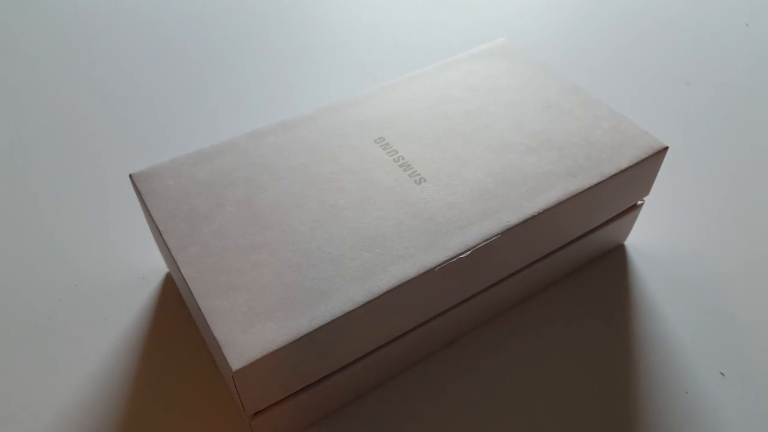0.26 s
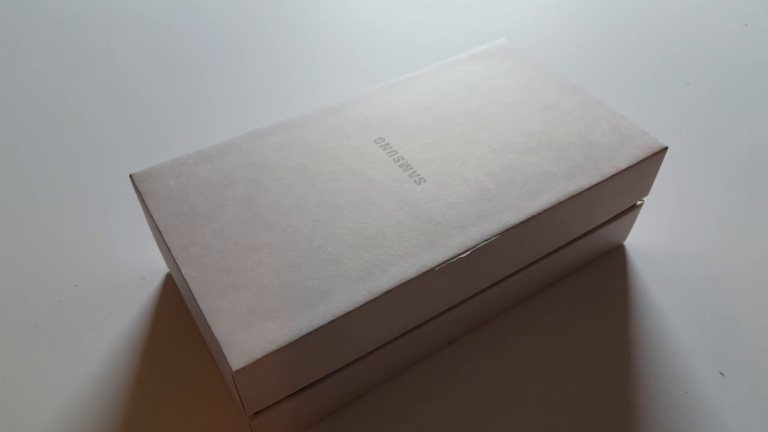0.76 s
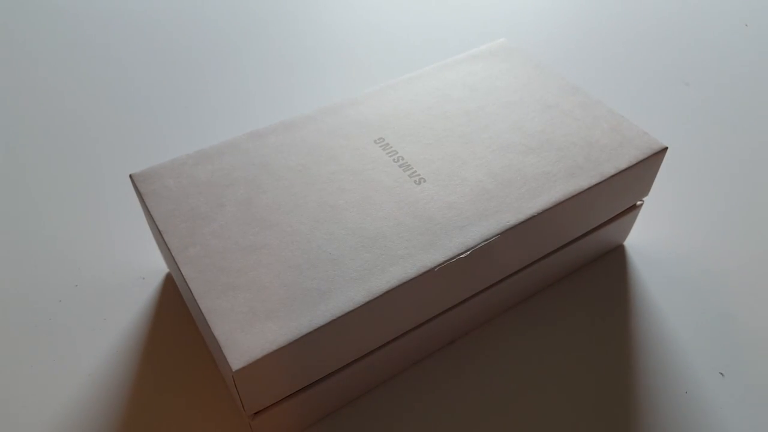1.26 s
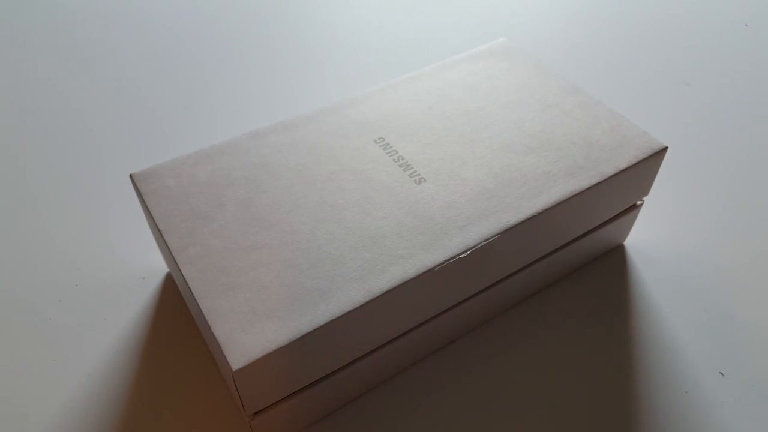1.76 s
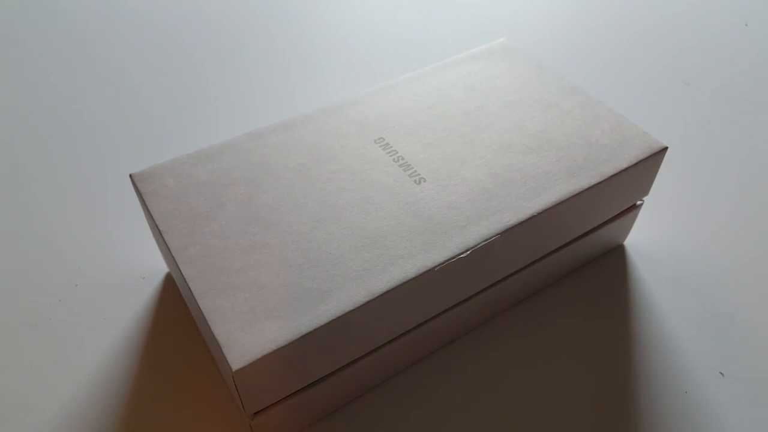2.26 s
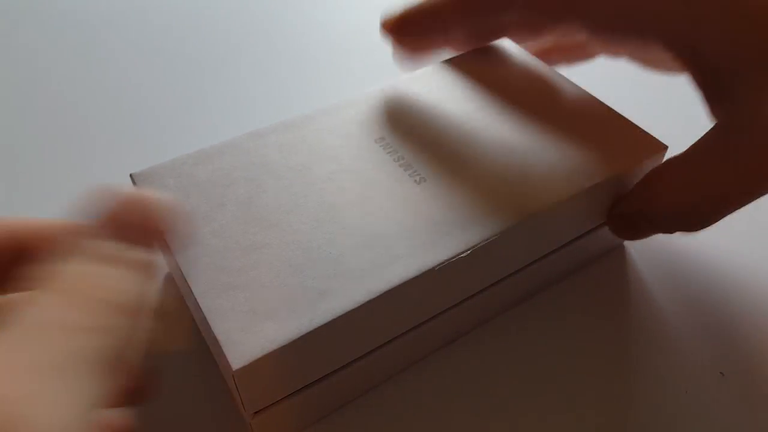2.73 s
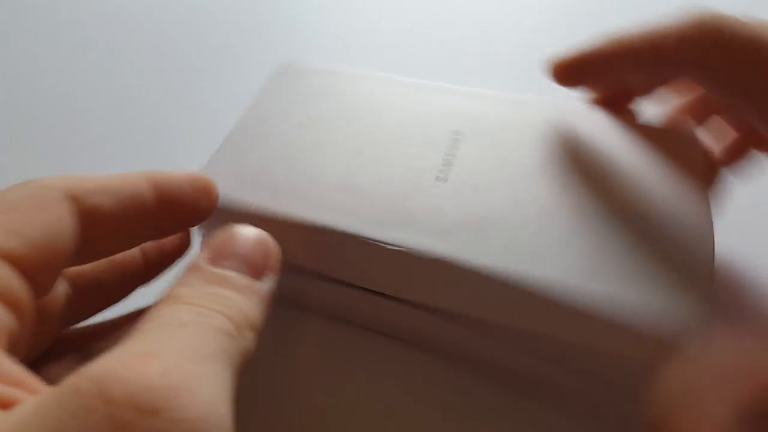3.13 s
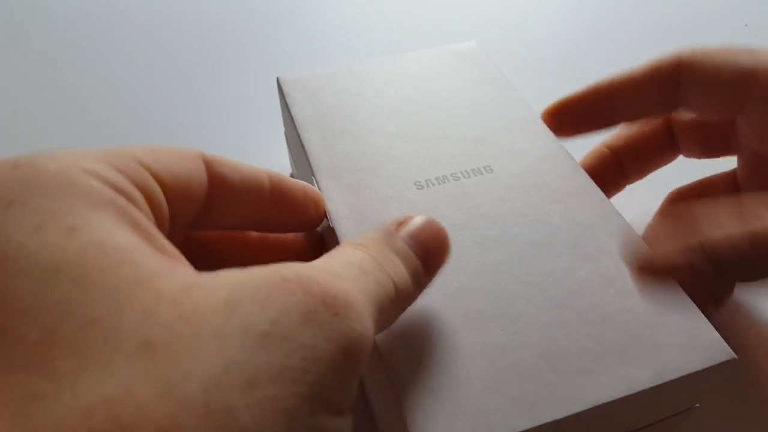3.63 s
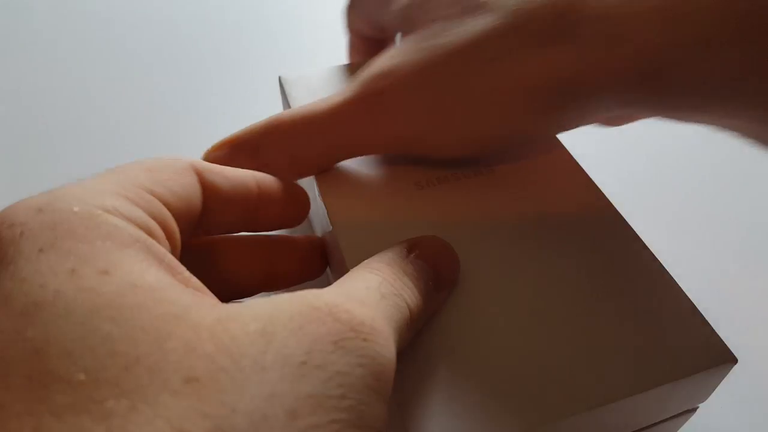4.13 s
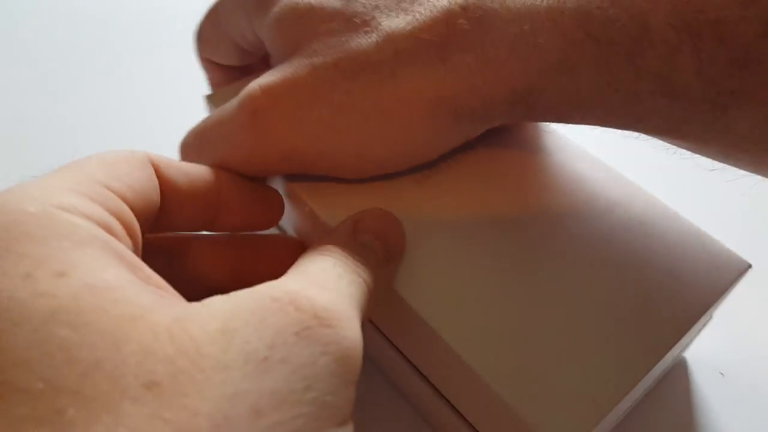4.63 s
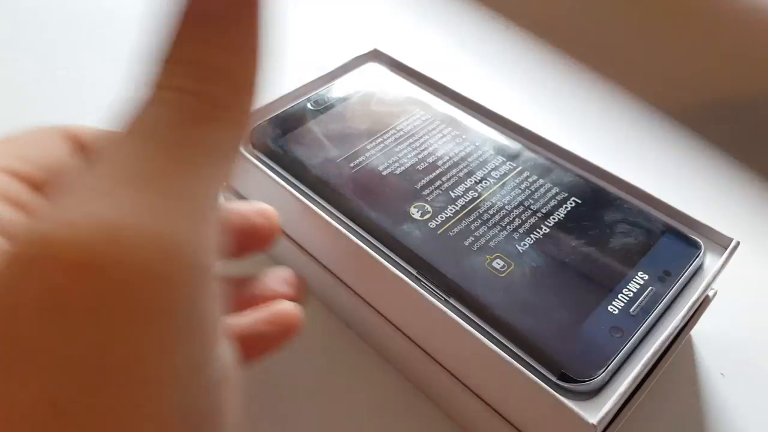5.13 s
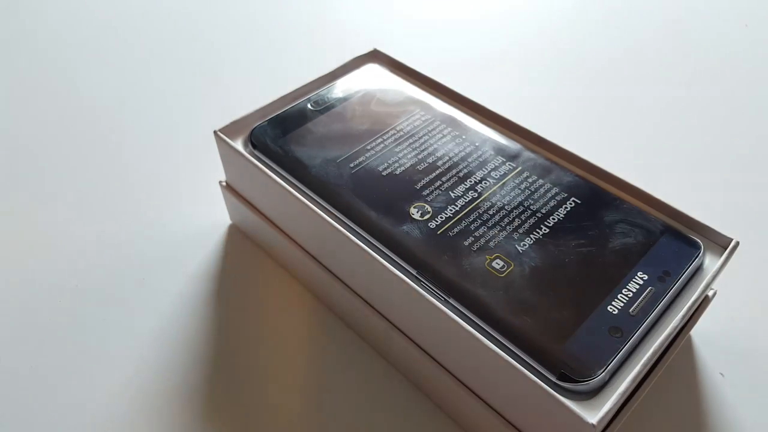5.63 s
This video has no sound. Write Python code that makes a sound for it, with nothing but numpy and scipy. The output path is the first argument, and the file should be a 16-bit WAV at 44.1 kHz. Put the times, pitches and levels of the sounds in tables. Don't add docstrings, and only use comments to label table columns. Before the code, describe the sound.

A small quiet room with soft low air noise and a barely audible hum. At about 0.1 s a hard double knock rings a hollow wooden table, with a short roomy tail. Faint skin and sleeve brushing follows; lighter knocks come in clusters near 1.25, 1.65 and 1.9 s, with a low rub on the table around 1.7 s. From 2.4 s a cardboard box close to the microphone is dragged and turned: dry, uneven stick-slip scraping, brightest from 3.1 to 3.4 s, ending in a dull tap. It settles with soft rustle until about 3.9 s. Drier finger taps with a deep soft thump come at 4.0 s, then small grip taps. Between 4.5 and 5.05 s the snug lid slides off with a hollow, papery, slightly squeaky rub and little bumps. Near quiet follows, then a light brush and clicks at 5.65 s, and soft bumps at 5.8 s.

```python
import sys
import numpy as np
from scipy import signal
from scipy.fft import rfft, irfft, next_fast_len
from scipy.io import wavfile
from scipy.ndimage import uniform_filter1d

SR = 44100
rng = np.random.default_rng(int(sys.argv[2]) if len(sys.argv) > 2 else 0)


def gain_from_decibels(decibels):
    exponent = np.asarray(decibels, float) / 20
    return 10 ** exponent


def wrap_up_sound(samples):
    columns = np.atleast_2d(samples).T
    tamed = np.clip(columns, -1, 1)
    steps = np.round(tamed * 32767).astype(np.int16)
    wavfile.write(sys.argv[1], SR, steps)


N = 259749

# frequency in Hz, side minus mid in dB.
SIDE_SPREAD = [(60, -16), (110, -12), (200, -19), (380, -9), (700, -7), (1290, 0.5), (2380, 0.5),
               (4400, 0.5), (8120, 0), (15000, 0.5)]


def level(x, db):
    return x * gain_from_decibels(db) / np.sqrt(np.mean(x ** 2))


def curve(hz, table):
    points, values = np.transpose(table)
    return np.interp(np.log(np.maximum(hz, 1)), np.log(points), values)


def colour(x, gain):
    size = next_fast_len(x.shape[-1])
    hz = np.arange(size // 2 + 1) * SR / size
    return irfft(rfft(x, size) * gain(hz), size)[..., :x.shape[-1]]


def split(x, edges_hz, order=3):
    bands = []
    for hz in edges_hz:
        lowpass = signal.butter(order, hz, fs=SR, output="sos")
        highpass = signal.butter(order, hz, "high", fs=SR, output="sos")
        bands.append(signal.sosfilt(lowpass, x))
        x = signal.sosfilt(highpass, x)
    return bands + [x]


def walk(rate):
    hold = int(SR / rate)
    steps = np.repeat(rng.standard_normal(N // hold + 1), hold)
    smooth = uniform_filter1d(uniform_filter1d(steps, hold), hold)
    return 0.478 * smooth[:N]


def ports(mid, side, table, pan_db=0):
    side = colour(side, lambda hz: gain_from_decibels(curve(hz, table)))
    return np.array([(mid + side) * gain_from_decibels(pan_db / 2), (mid - side) * gain_from_decibels(-pan_db / 2)])


def hush():
    # frequency in Hz, density in dB per Hz.
    air = [(12, -29), (20, -4), (60, -11), (91, 0.5), (138, -3.5), (210, -8), (399, -3.5), (446, -6.5),
           (780, -19), (2020, -24.5), (2260, -21), (2460, -25), (9400, -38.5), (13500, -31), (16000, -34)]
    # frequency in Hz, side minus mid in dB.
    air_spread = [(60, -8), (110, -10), (200, -3.5), (380, -9), (700, 1.5), (1290, 4.5), (2380, -1),
                  (4400, 1.5), (8120, 1), (15000, 1.5)]
    # frequency in Hz, level in dB.
    hum = [
        (120.5, -70),
        (13318, -90),
        (14330, -104),
    ]
    noise = colour(rng.standard_normal((2, N)), lambda hz: gain_from_decibels(curve(hz, air)))
    bands = split(noise, [150, 400, 1200])
    wander_db = (0.73, 15.0, 1.9, 0.68)
    mid, side = level(sum(band * gain_from_decibels(db * walk(3.1)) for band, db in zip(bands, wander_db)), -66.5)
    s = np.arange(N) / SR
    tones = 0
    for hz, db in hum:
        tones = tones + np.sqrt(2) * gain_from_decibels(db + 3.0 * walk(7.7)) * np.sin(2 * np.pi * hz * s)
    return ports(mid, side, air_spread) + tones


def fibres(rate, spread_db):
    size_db = spread_db * np.minimum(rng.exponential(size=N), 3)
    slips = (rng.random(N) < rate / SR) * gain_from_decibels(size_db)
    slips = uniform_filter1d(slips, size=24)
    return level(rng.standard_normal((2, N)) * (3 + level(slips, 0)), 0)


def table_top(x, damping=1):
    # frequency in Hz, level in dB, t60 in s.
    modes = [(121, -22, 0.5), (166.1, -15.5, 0.52), (197, -20, 0.4), (229, -10.5, 0.35), (261, -28.5, 0.89),
             (301, -10.5, 0.3), (400, -6.5, 0.17), (542, -15, 0.075), (612, -11.5, 0.22), (1455, -24, 0.2),
             (1081, -16, 0.2), (762, -20.5, 0.19), (1302, -24, .2), (955, -24, .2)]
    s = np.arange(SR // 2) / SR
    top = 0
    for hz, db, t60 in modes:
        decay = np.exp(-np.log(1000) * damping * s / t60)
        top = top + gain_from_decibels(db) * np.sin(2 * np.pi * hz * s) * decay
    return signal.fftconvolve(np.atleast_2d(x), top[None], axes=1)[:, :N]


def dragging(now):
    # time in s, drag level in dB, brightness in dB.
    shuffle = [(0, -68.5, 6.5), (.07, -76.5, 8.5), (.4, -70, -9.5), (.7, -79, -5), (.86, -67.5, -5.5),
               (1.04, -72, 1.5), (1.2, -62.5, -10), (1.47, -65, -3), (1.61, -67, -2.5)]
    nudge = [(1.71, -48, -15), (1.8, -55, -9.5), (1.88, -59, -6), (2.0, -64, -4), (2.2, -75, -6)]
    turning = [(2.28, -70, -6), (2.44, -52, -6.5), (2.58, -62.5, -6.5), (2.86, -63.5, -14),
               (3.12, -58.5, 3), (3.3, -59.5, 4), (3.4, -53, -6)]
    settle = [(3.5, -57.5, -4), (3.62, -59.5, -4), (3.75, -61, -7.5), (3.87, -63, -5), (3.96, -66.5, -6)]
    grip = [(4.1, -68, -8), (4.2, -66, -8), (4.27, -63, -6), (4.3, -60.5, -3), (4.4, -62, -3),
            (4.44, -61, -3), (4.46, -57, -3), (4.51, -59, -4)]
    lid = [(4.54, -55, -6.5), (4.575, -59, -5), (4.63, -53.5, -4.5), (4.78, -53, -3.5), (4.94, -56.5, -9),
           (5.03, -62.5, -11), (5.1, -78, -15)]
    leaving = [(5.3, -78, -12), (5.42, -68.5, -7), (5.6, -66, -5.5), (5.75, -69, -1.5), (5.85, -60.5, -9.5),
               (5.89, -64, -7)]
    s, press_db, bright_db = np.transpose(shuffle + nudge + turning + settle + grip + lid + leaving)
    return np.interp(now, s, press_db), np.interp(now, s, bright_db)


def brushing(now):
    # start in s, length in s, hiss in dB, scrape above hiss in dB, left minus right in dB.
    strokes = [(0, 0.057, -76, 3, -3), (.08, 0.096, -69.5, 7, -1), (0.199, 0.65, -86.5, -1.5, 1),
               (1.085, 0.31, -66, 3.5, 0), (1.633, 0.15, -69, 3, -2.5), (1.902, 0.022, -62, 6, -1),
               (2.3, .04, -74, -5, -1), (2.35, 0.17, -65.5, -10, -1.5), (2.545, 0.3, -67.5, 3, -1.5),
               (2.877, 0.1, -66.5, 5.5, -1), (2.982, 0.075, -66, 6, -1), (3.075, .08, -63.5, 7, -1),
               (3.165, .03, -67, 4, -1), (3.197, 0.11, -57.5, -2, 1), (3.323, 0.21, -63, -2.5, -1),
               (3.53, 0.11, -64.5, -0.5, -1), (3.64, 0.079, -65, 0, -1), (3.728, .06, -67.5, -2, -1.5),
               (3.811, 0.048, -51.5, -7, -1.5), (3.88, 0.27, -71, -7, -1), (4.184, 0.36, -71.5, -10, -1),
               (4.447, 0.032, -58.5, 4, -3), (4.48, .03, -63, 4, -2), (4.521, 0.032, -63.5, 4, -1),
               (4.59, .02, -66, 6, 0), (4.615, 0.043, -61, 6.5, 0), (4.68, .03, -69, 6, 0),
               (4.801, 0.085, -63, 6, 0.5), (4.973, 0.035, -58.5, 2.5, 0.5), (5.015, 0.017, -60.5, 2.5, .5),
               (5.101, 0.43, -85, 1.5, -1), (5.397, .03, -77, 3, -5), (5.645, 0.035, -63.5, 6.5, -11),
               (5.8, 0.016, -69.5, 2, -4), (5.867, 0.0093, -70.5, -7, -3)]
    s, length, db, scrape_db, pan_db = np.transpose(strokes)[:, :, None]
    early, late = np.maximum(s - now, 0), np.maximum(now - s - length, 0)
    attack_s, release_s = 0.0079 + 0.089 * length, 0.0071 + 0.089 * length
    fade_db = 10 * early / attack_s + 10 * late / release_s
    arch_db = 2.5 * np.clip(2 * (now - s) / length - 1, -1, 1) ** 2
    linger_db, linger_s = -12.5, 0.064
    linger = (late > 0) * gain_from_decibels(2 * (db + linger_db - 10 * late / linger_s))
    power = gain_from_decibels(2 * (db - arch_db - fade_db)) + linger
    hiss = np.sum(power, 0)
    pan = np.sum(power * pan_db, 0) / (hiss + gain_from_decibels(2 * -74))
    return np.sum(power * gain_from_decibels(2 * scrape_db), 0), hiss, pan


def singing(now):
    # start in s, length in s, frequency in Hz, width in Hz, level in dB. Panels that ring #
    # when struck, and a brief squeal near 1.9 kHz while the card scrapes.
    rings = [(.0998, .0015, 2550, 600, -27.5), (.104, .025, 2700, 1100, -46), (.106, .03, 1070, 60, -41),
             (.104, .025, 560, 120, -33), (.1, .003, 5000, 900, -47), (.086, .01, 6500, 3000, -61),
             (1.2692, .003, 750, 401, -36.5), (1.285, .003, 500, 300, -41), (1.275, .02, 1900, 300, -59),
             (1.6228, .003, 550, 300, -41.5), (1.63, .04, 3700, 900, -62.5), (1.63, .05, 750, 200, -55.5),
             (1.68, .006, 2900, 900, -56), (1.624, .013, 1900, 250, -55), (1.655, .014, 1900, 120, -60),
             (1.703, .018, 1900, 120, -57), (1.728, .032, 1875, 90, -60), (1.778, .022, 1900, 100, -65),
             (1.70, .025, 3150, 300, -61.5), (1.70, .07, 4100, 600, -68), (1.72, .05, 700, 200, -58),
             (1.78, .04, 300, 40, -51), (1.88, .02, 1900, 150, -65), (1.878, .018, 3300, 300, -69),
             (1.912, .006, 2200, 1000, -45.5), (1.912, .007, 3700, 700, -52.5), (1.93, .03, 300, 35, -46),
             (4.137, .003, 460, 150, -47), (4.452, .035, 3110, 130, -63.5), (4.67, .008, 520, 100, -58),
             (5.87, .006, 900, 200, -62.5)]
    sings = [(.81, .09, 1310, 130, -72), (1.0, .2, 1310, 78, -74.5), (.82, 0.242, 2900, 300, -77.5),
             (1.43, .14, 3680, 190, -75), (1.44, .14, 1250, 180, -72), (2.37, .15, 1120, 100, -63),
             (2.35, .16, 4800, 540, -69.5), (2.36, .19, 12300, 1200, -67.5), (2.36, .15, 12000, 600, -70),
             (2.92, .26, 10700, 600, -70.5), (3.0, 0.138, 2300, 160, -66.5), (3.23, .09, 2120, 130, -63),
             (3.1, 0.11, 1000, 100, -60), (3.3, .16, 1060, 150, -64), (3.05, .22, 780, 110, -60.5),
             (3.1, 0.11, 540, 56, -60), (3.13, .04, 1630, 100, -66), (3.21, 0.08, 4580, 150, -67),
             (3.26, .12, 3550, 150, -72), (3.4, .12, 4800, 410, -71), (3.31, .04, 164, 25, -55),
             (3.62, .3, 380, 107, -60), (4.66, .15, 850, 98, -58.5), (4.67, 0.1496, 1250, 120, -58.5),
             (4.62, .24, 1830, 140, -63), (4.59, .17, 2050, 140, -65), (4.74, .1, 1550, 170, -67),
             (4.6, .24, 2950, 120, -63.5), (4.6, .1, 4400, 250, -65), (4.8, .1, 4700, 440, -63.5),
             (4.81, .08, 11500, 1600, -67.5), (4.96, .04, 2050, 200, -62), (4.98, .045, 4700, 1000, -58),
             (5.5, .1, 1350, 130, -71.5), (5.82, .07, 1200, 60, -69), (5.64, .04, 4800, 1200, -62),
             (5.645, .035, 1900, 150, -70), (5.645, .035, 2700, 300, -67), (5.66, 0.0153, 680, 90, -63),
             (5.81, .05, 166, 25, -51.5),
             (2.75, .035, 550, 210, -60), (2.31, .05, 4900, 400, -77), (2.6, .05, 1100, 150, -71),
               (3.15, 0.0079, 900, 500, -58), (3.372, .02, 1100, 600, -55.5),
               (4.98, .05, 6000, 1200, -64.5), (5.04, .03, 2500, 1500, -73), (5.005, .03, 11000, 1500, -66),
               (5.674, .002, 5500, 2500, -55.5), (5.68, .022, 4000, 2500, -67),
               (4.68, .1, 1400, 1200, -58.5), (4.02, 0.0301, 600, 300, -58.5), (5.15, .15, 230, 60, -69.5),
               (.86, 0.029, 115, 30, -62), (2.9, 0.0804, 140, 40, -60), (2.42, .14, 380, 100, -60),
               (2.57, .03, 150, 40, -56), (3.74, .08, 1150, 150, -69), (4.28, .15, 10600, 500, -78),
               (3.38, .04, 550, 250, -54), (3.42, .06, 2200, 150, -67), (1.272, .04, 160, 40, -45),
               (1.63, .05, 155, 40, -43), (1.93, .04, 110, 40, -50), (5.56, .04, 150, 40, -58),
               (4.3, .012, 4000, 2000, -72), (3.72, .008, 400, 300, -55)]
    struck_side_db = -2.5
    steady = 0.5
    wander, wander_s = 0.02, 0.1
    out = np.zeros((2, N))
    rub = rng.standard_normal((2, N)) + 1j * rng.standard_normal((2, N))
    stray, hold = walk(9), gain_from_decibels(2.5 * walk(30))
    for k, (start, length, hz, width_hz, db) in enumerate(rings + sings):
        rise, fade = 0.0005 + 0.3 * length, 0.004 + 0.3 * length
        inside = (now > start - rise) & (now < start + length + fade)
        t = now[inside] - start
        swell = np.clip(t / rise + 1, 0, 1) * np.clip((length - t) / fade + 1, 0, 1)
        keep = np.exp(-np.pi * 1.4 * width_hz / SR)
        own = (np.flatnonzero(inside) + k * SR // 3) % N
        noise = signal.lfilter([1], [1, -2 * keep, keep ** 2], rub[:, own])
        noise = noise / np.abs(noise) ** steady * swell ** 2 * hold[own]
        noise[1] *= gain_from_decibels(struck_side_db * (k < len(rings)))
        pitch = hz * (1 + wander * min(length / wander_s, 1) * stray[own])
        carrier = np.exp(2j * np.pi * np.cumsum(pitch) / SR)
        out[:, inside] += level(np.real(noise * carrier), db)
    return out


def rubbing():
    # frequency in Hz, density in dB per Hz.
    rub_colour = [(24, -40), (40, -20.5), (155, -4), (249, -4.5), (297, -0.5), (329, -3), (529, 1.5),
                  (630, -4.5), (810, -2.5), (1520, -15.5), (2150, -19.5), (2910, -19.5), (8340, -33.5),
                  (11000, -23), (16000, -27)]
    rub_edges_hz = [110, 235, 1750, 7000]
    now = np.arange(N) / SR
    press_db, bright_db = dragging(now)
    scrape, hiss, pan = (np.interp(now, now[::32], v) for v in brushing(now[::32]))
    rumble = gain_from_decibels(-60 + 0.57 * (press_db + 60))
    drag = gain_from_decibels(press_db)
    card = drag * gain_from_decibels(bright_db)
    scrape = np.sqrt(card ** 2 + scrape)
    hiss = np.sqrt((card * gain_from_decibels(-15.5)) ** 2 + hiss)

    def rub_gain(hz):
        return gain_from_decibels(curve(hz, rub_colour) - 5.5 * np.clip(hz / 3000 - 4.2, 0, 1))

    contact = colour(fibres(900, 4.0), rub_gain)
    contact = contact + gain_from_decibels(-46.0) * table_top(contact)
    gap_s, gap_stray, gap_db = 0.0016, 0.5, -15.5
    late = (now - gap_s * (1 + gap_stray * walk(4))) * SR
    contact = contact + gain_from_decibels(gap_db) * np.array([np.interp(late, now * SR, c) for c in contact])
    deep, low, *upper = split(contact, rub_edges_hz, order=4)
    hands_in_s = 2.5
    low = low + deep * gain_from_decibels(np.where(now < hands_in_s, -12, 1.5))
    catch, out = walk(12), singing(now)
    patches_db = (1.05, 6.9, 0.9, 0.62)
    for band, size, patchy_db in zip([low] + upper, (rumble, drag, scrape, hiss), patches_db):
        out = out + level(band, 0) * size * gain_from_decibels(1.47 * catch + patchy_db * walk(25.017))
    return ports(out[0], out[1], SIDE_SPREAD, pan)


def room(size=26000):
    # frequency in Hz, t60 in s.
    room_t60 = [(60, 0.18), (200, 0.3), (600, 0.22), (2000, 0.25), (5000, 0.25), (12000, 0.046)]
    s, tail = np.arange(size) / SR, 0
    edges_hz = 60 * 2 ** np.arange(8.)
    bands = split(rng.standard_normal((2, size)), edges_hz)
    for hz, band in zip(np.append(edges_hz / np.sqrt(2), 11000), bands):
        t60 = curve(hz, room_t60)
        tail = tail + band * np.exp(-np.log(1000) * s / t60) / np.sqrt(t60)
    tail = tail * np.clip(s / 0.0026, 0, 1)
    return tail / np.sqrt(np.sum(tail[0] ** 2))


def causal(gain_db):
    cepstrum = irfft(gain_db * np.log(10) / 20)
    half = len(cepstrum) // 2
    cepstrum[1:half] *= 2
    cepstrum[half + 1:] = 0
    return irfft(np.exp(rfft(cepstrum)))


def blows(events, contact_s, rough, deep_db=-30, top_db=-6, size=2048):
    knock_hz = [40, 150, 350, 1200, 2800, 7500, 16000]
    push, s = np.zeros(N + 2 * size), np.arange(size) / SR
    hz = np.arange(size // 2 + 1) * SR / size
    for (start, db, thump, knock, tick), grit in zip(events, rng.standard_normal((len(events), size))):
        crack = knock + 0.39 * (tick - knock) + 3
        shape = list(zip(knock_hz, (thump + deep_db, thump, 0, knock, crack, tick, tick + top_db)))
        chatter = rfft(rough * grit * np.exp(-s / contact_s) - (s == 0))
        chatter = irfft(chatter / np.abs(chatter))
        blow = np.convolve(causal(db + curve(hz, shape)), chatter * np.exp(-s / (4 * contact_s)))
        push[int(start * SR):][:len(blow)] += blow
    return push[:N]


def heard(push, tails, direct_db, table_db, table_hz, damping, room_db, room_hz, side_db, pan_db):
    soft = signal.sosfilt(signal.butter(2, table_hz, fs=SR, output="sos"), push)
    near = gain_from_decibels(direct_db) * push + gain_from_decibels(table_db) * table_top(soft, damping)[0]
    dull = signal.sosfilt(signal.butter(1, room_hz, fs=SR, output="sos"), push)
    mid, side = (gain_from_decibels(room_db) * signal.fftconvolve(dull, tail)[:N] for tail in tails)
    return ports(near + mid, gain_from_decibels(side_db) * np.roll(near, 3) + side, SIDE_SPREAD, pan_db)


def knocks():
    # start in s, body in dB per Hz near 350 Hz, heft in dB at 150 Hz,
    # hardness in dB at 1.2 kHz, edge in dB at 7.5 kHz.
    far_knocks = [(0.073, 14, 3.5, -10.5, -46.5), (0.0951, 20.5, 6, -9, -72),
                  (0.0992, 28.5, -5.5, -10.5, -52), (1.233, 0, 6, -5, -30), (1.242, 1, -16, -16, -43),
                  (1.253, 5.5, -21, -15, -40.5), (1.27, 11.5, -1, -17, -38), (1.285, 12, 0.5, -19.5, -61),
                  (1.623, 15, 1, -26, -48), (1.681, 3.5, 11, -11.5, -27.5), (1.698, 3, 1, -14, -37),
                  (1.71, 1, 1, -12, -36), (1.879, 4.5, -2, -29, -39), (1.9115, 12, 6, -14, -28),
                  (2.23, -26.5, 11, -1, -19)]
    finger_taps = [(2.816, -6.5, 16.5, -31, -36), (2.959, -16, -2, -10, -25), (3.367, 5, 6.5, -17, -40),
                   (3.374, -7, -1, -4, -30), (3.45, -15, 0, -8, -25), (4.012, -4, 14, -8, -20),
                   (4.016, -3, 7, -7.5, -32), (4.028, -6, 15, -25, -45), (4.043, -9, 14, -25, -45),
                   (4.135, -4, -16, -20, -35), (4.168, -7, -5, -25, -40), (4.232, -9.5, -6, -25, -40),
                   (4.446, -12, -2, -7, -18), (4.527, 8, -6.5, -32, -45), (4.533, -22, 0, 0, -6),
                   (4.588, -12.5, 0, -5, -25), (4.613, 1, 13.5, -20, -40), (4.707, -10, 0, -3, -28),
                   (4.778, -10, 0, -3, -28), (4.696, -12, -5, -5, -25), (4.837, -16.5, 26, 1, -11.5),
                   (4.958, -5, 5.5, -15, -40), (5.034, -6, 0.5, -8.5, -16.5), (5.223, -23.5, 6, 0.5, -16.5),
                   (5.315, -30, 4.5, -2, -16), (5.398, -27, 3, -2, -14), (5.57, -18.5, 18, -4, -39),
                   (5.674, -1, -10, -11.5, -30), (5.702, -18, -7, -1, -25), (5.738, -16.5, 5, -10, -26),
                   (5.795, 0, 12, -25, -48), (5.87, -11, 7, -4.5, -24)]
    tails = room()
    far = blows(far_knocks, contact_s=0.0029, rough=0.28)
    taps = blows(finger_taps, contact_s=0.00295, rough=0.38)
    far = heard(far, tails, direct_db=-5.5, table_db=-40.5, table_hz=1280, damping=1.14,
                room_db=4.5, room_hz=2800, side_db=-2.5, pan_db=-0.3)
    taps = heard(taps, tails, direct_db=-5.0, table_db=-34.5, table_hz=224, damping=1.42,
                 room_db=-5, room_hz=3970, side_db=-8, pan_db=-0.2)
    return far + taps


def thuds(rise_s=0.0094, side_db=-5):
    # start in s, peak in dB, frequency in Hz, t60 in s.
    landings = [(0.076, -43, 78.4, 0.43), (0.844, -54.5, 189, 0.24), (1.234, -41, 72, 0.22),
                (1.915, -49, 65, 0.24), (2.42, -44.5, 60.4, 0.18), (2.57, -50, 111, 0.17),
                (2.82, -45, 69.6, .15), (2.90, -52, 60, 0.14), (3.366, -46, 70.4, 0.18),
                (3.618, -43, 60, 0.13), (3.81, -49, 62, 0.16), (3.818, -52, 151, .2),
                (4.012, -36, 59.4, 0.15), (4.19, -59, 60, 0.17), (4.45, -45, 60, 0.13),
                (4.615, -39.5, 55, 0.25), (4.837, -40, 60, 0.19), (5.42, -55.5, 60, 0.13),
                (5.801, -46, 70, 0.23)]
    out, s = np.zeros(N + SR), np.arange(SR // 2) / SR
    for start, db, hz, t60 in landings:
        decay = np.exp(-np.log(1000) * s / t60)
        swing = np.sin(2 * np.pi * hz * s) * decay * (1 - np.exp(-s / rise_s))
        out[int(start * SR):][:len(s)] += gain_from_decibels(db) * swing
    side = gain_from_decibels(side_db) * np.roll(out, 150)
    return np.array([out + side, out - side])[:, :N]


def scene():
    return hush() + rubbing() + knocks() + thuds()


def top_cut(x):
    return signal.sosfilt(signal.butter(12, 16150, fs=SR, output="sos"), x)


def record(dry):
    top_hz = 15790
    cut = colour(dry, lambda hz: hz < top_hz)
    return top_cut(cut)


dry = scene()
out = record(dry)
wrap_up_sound(out)
```